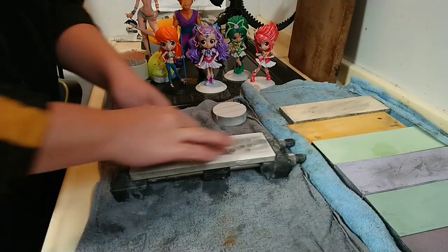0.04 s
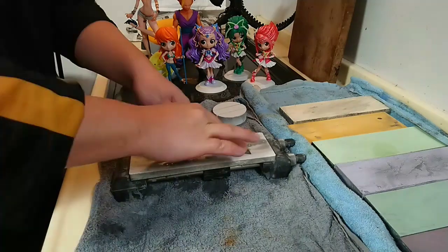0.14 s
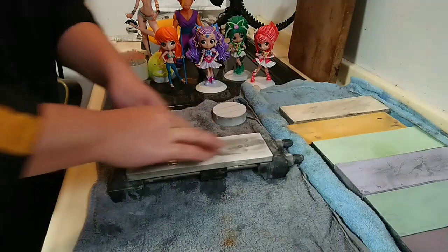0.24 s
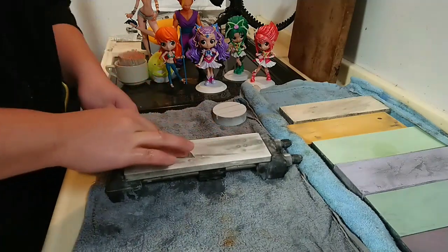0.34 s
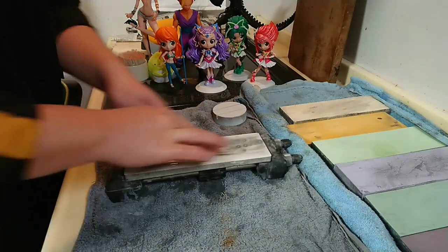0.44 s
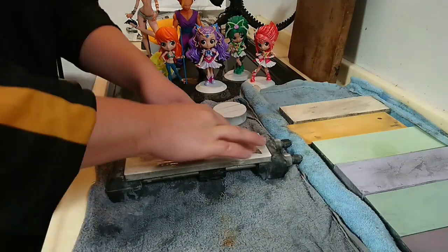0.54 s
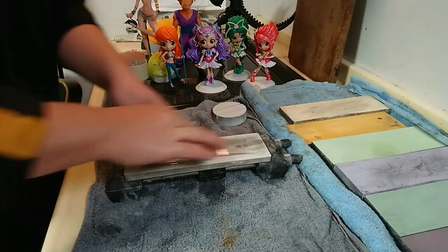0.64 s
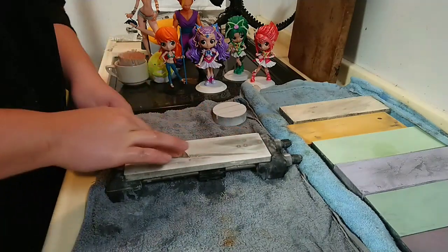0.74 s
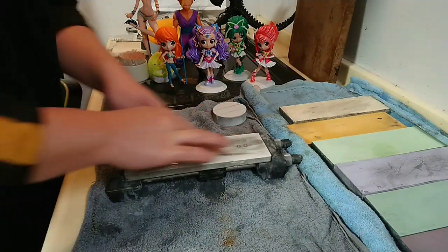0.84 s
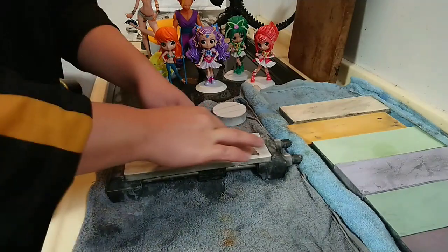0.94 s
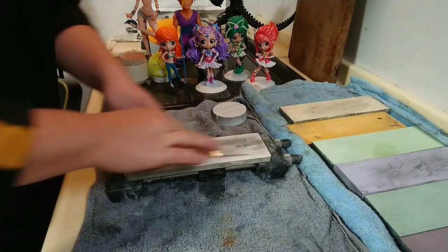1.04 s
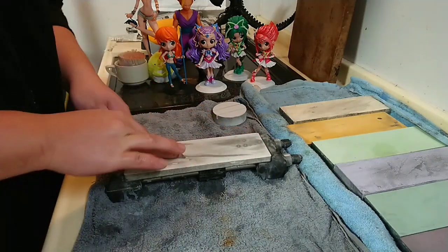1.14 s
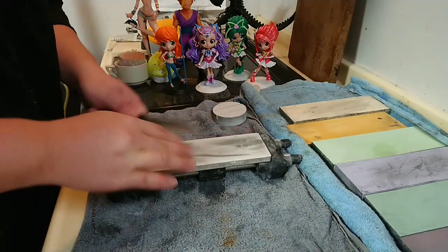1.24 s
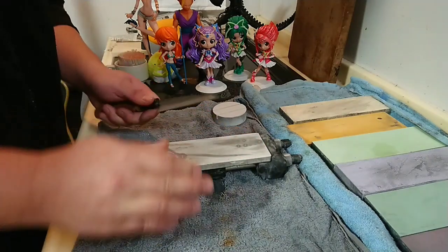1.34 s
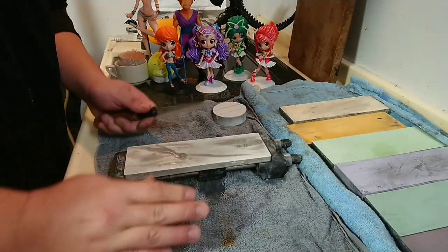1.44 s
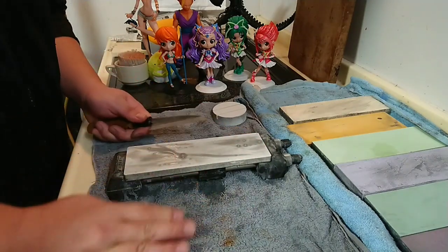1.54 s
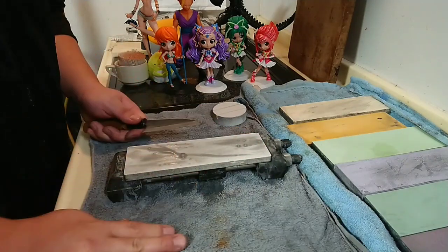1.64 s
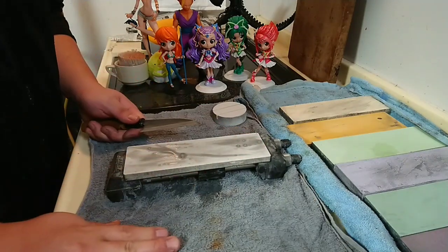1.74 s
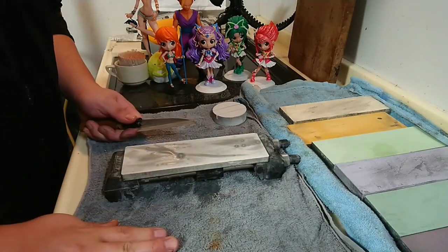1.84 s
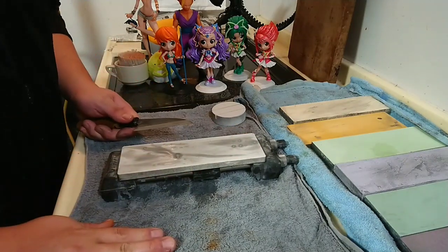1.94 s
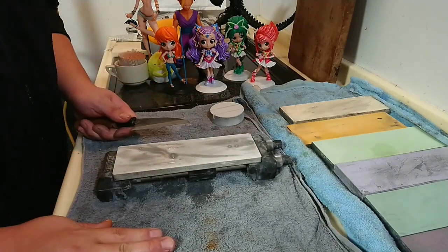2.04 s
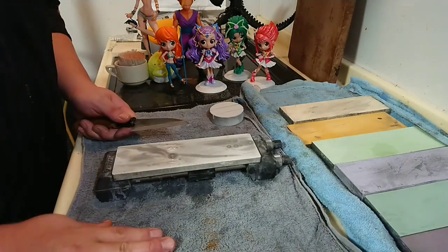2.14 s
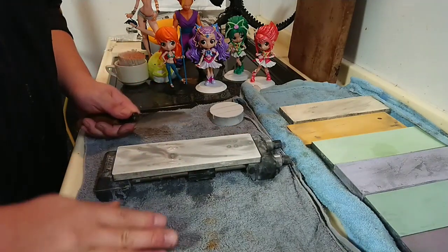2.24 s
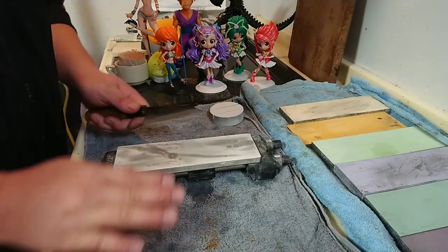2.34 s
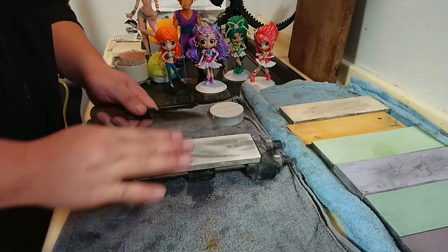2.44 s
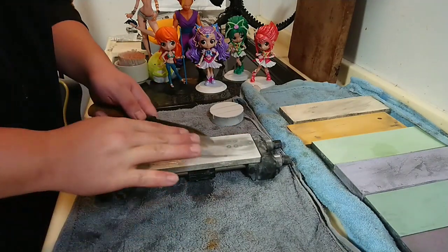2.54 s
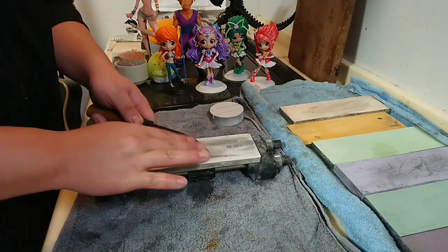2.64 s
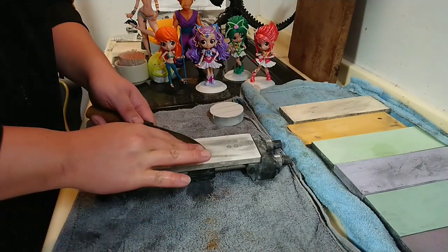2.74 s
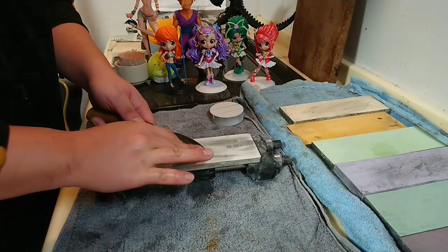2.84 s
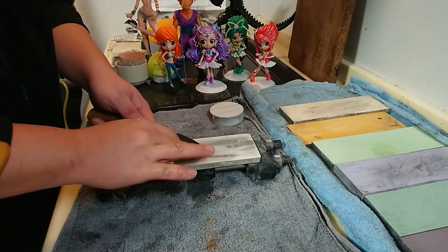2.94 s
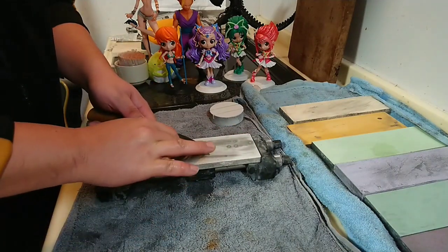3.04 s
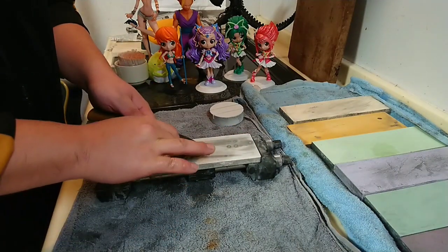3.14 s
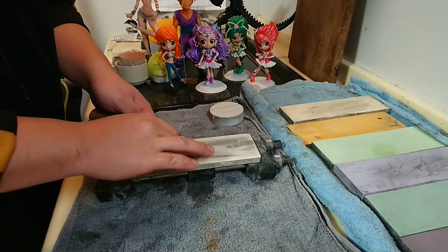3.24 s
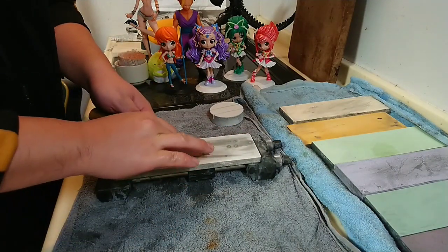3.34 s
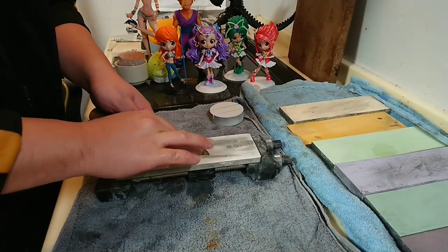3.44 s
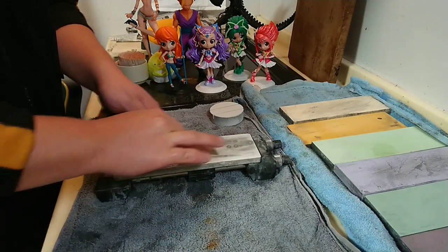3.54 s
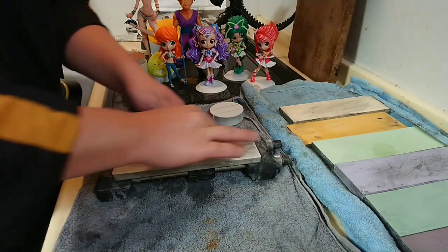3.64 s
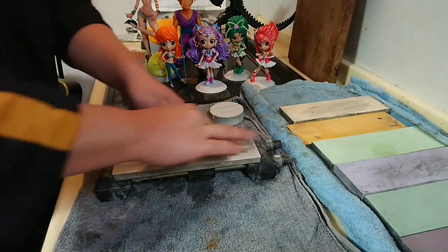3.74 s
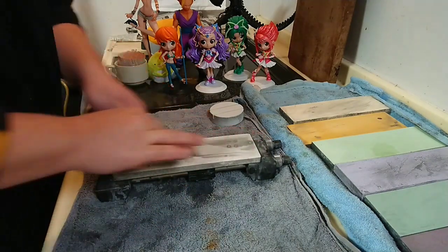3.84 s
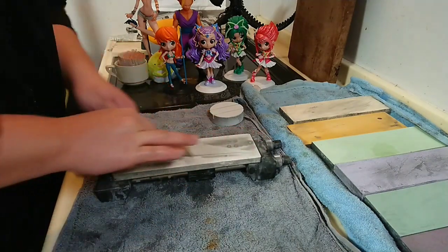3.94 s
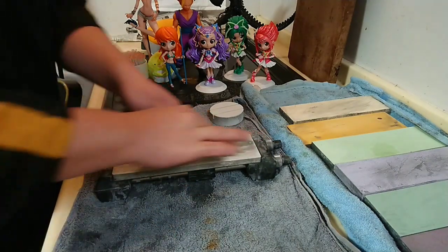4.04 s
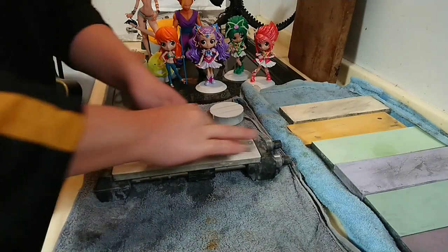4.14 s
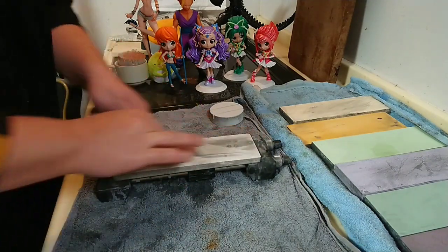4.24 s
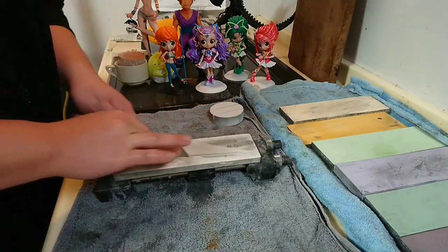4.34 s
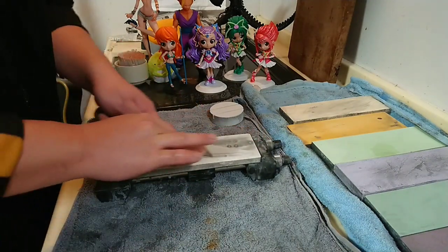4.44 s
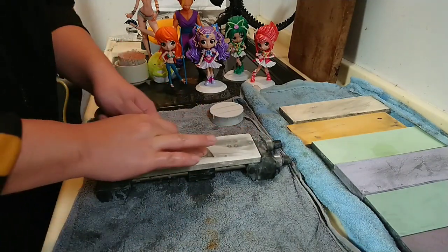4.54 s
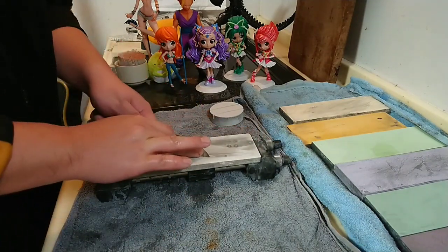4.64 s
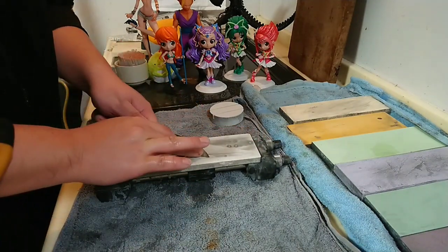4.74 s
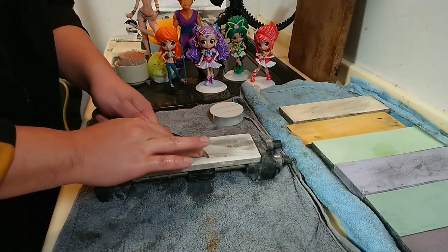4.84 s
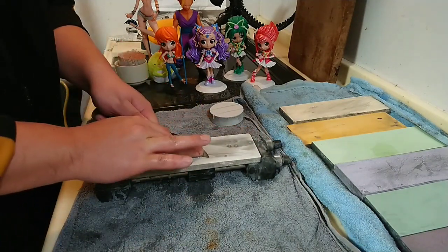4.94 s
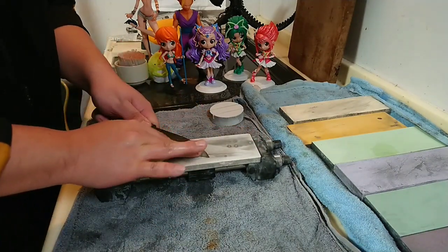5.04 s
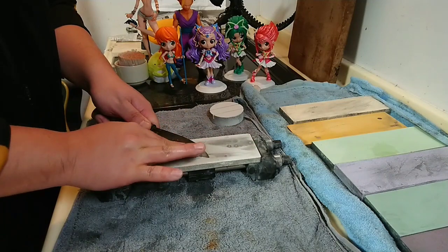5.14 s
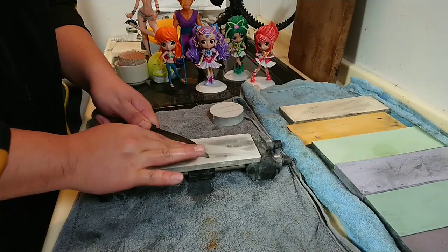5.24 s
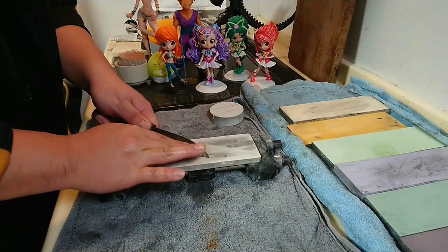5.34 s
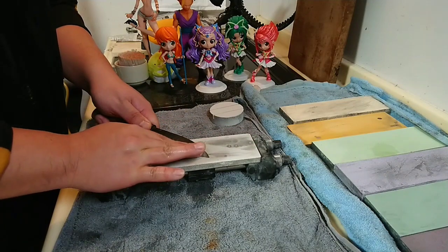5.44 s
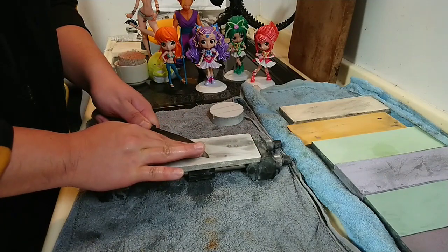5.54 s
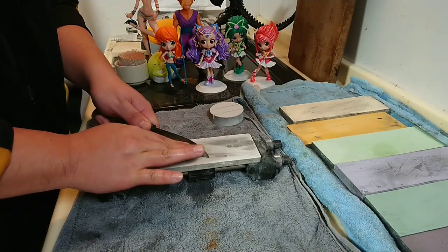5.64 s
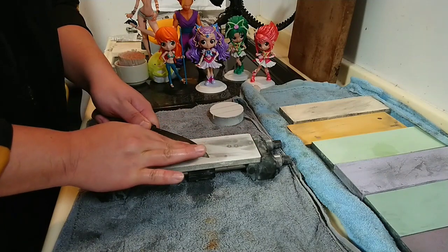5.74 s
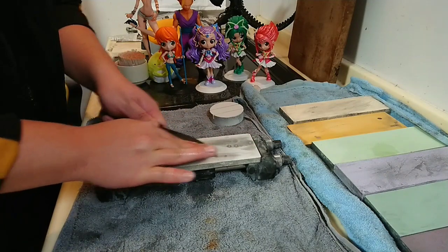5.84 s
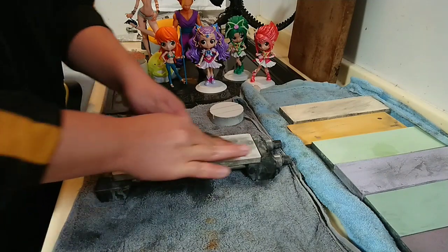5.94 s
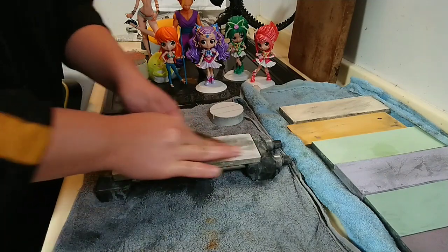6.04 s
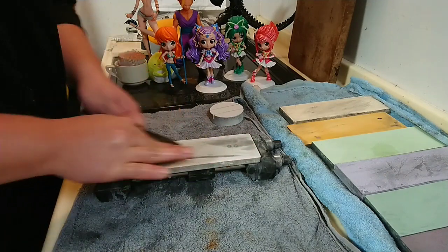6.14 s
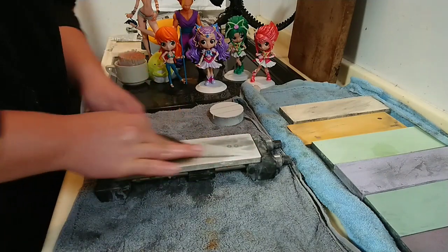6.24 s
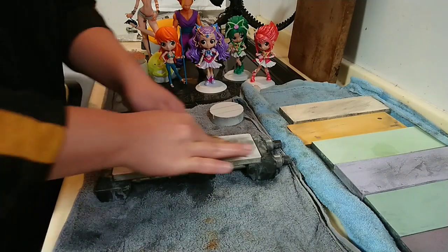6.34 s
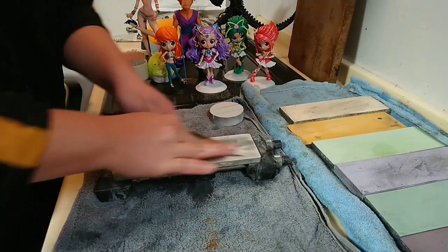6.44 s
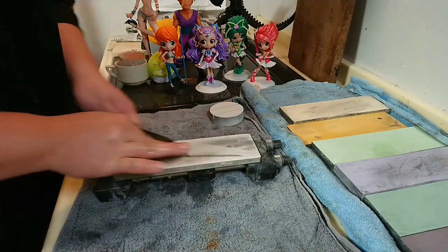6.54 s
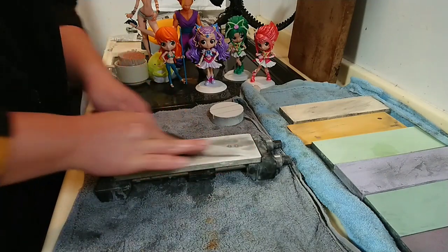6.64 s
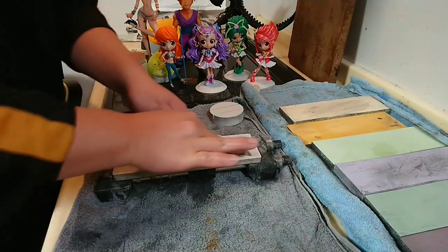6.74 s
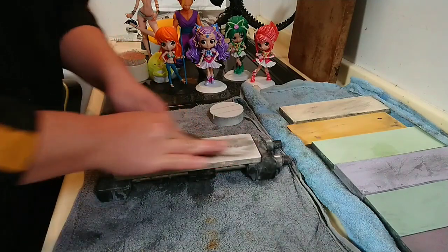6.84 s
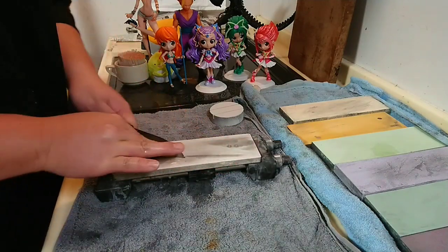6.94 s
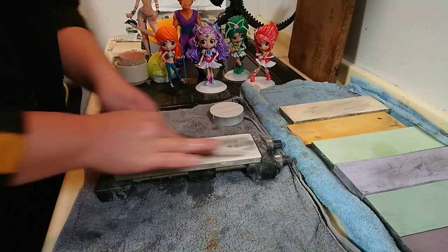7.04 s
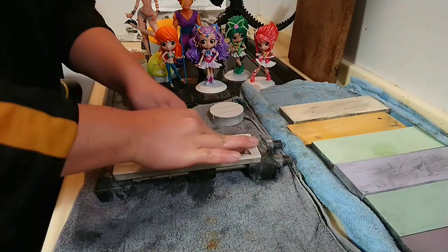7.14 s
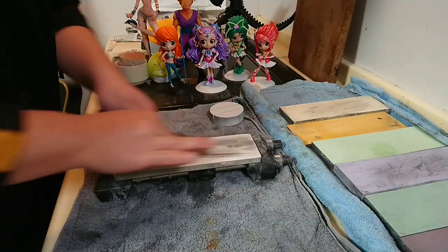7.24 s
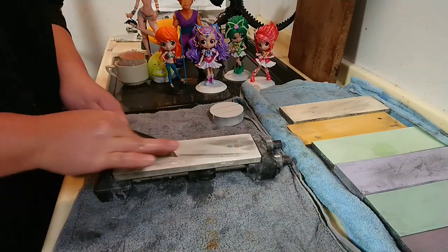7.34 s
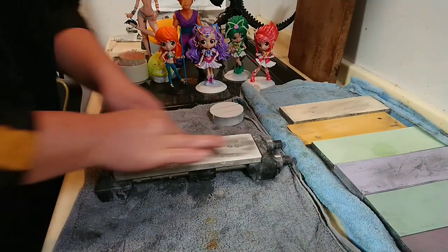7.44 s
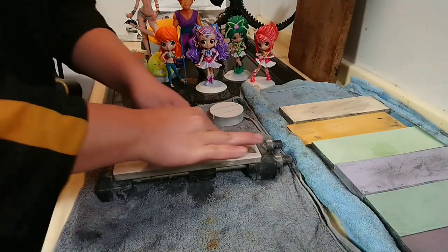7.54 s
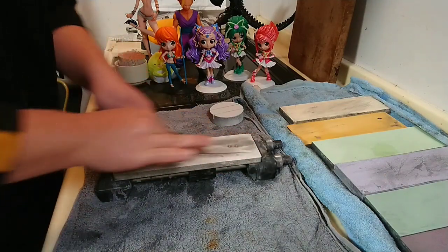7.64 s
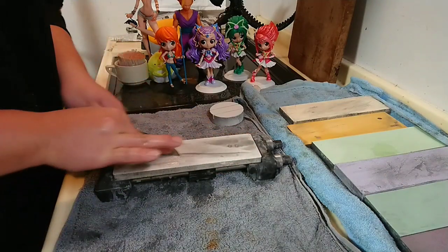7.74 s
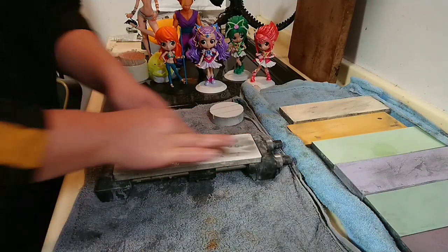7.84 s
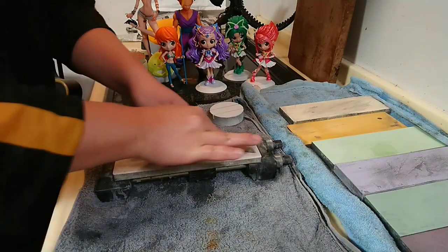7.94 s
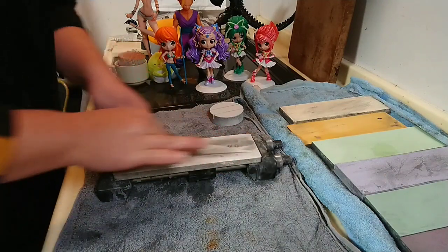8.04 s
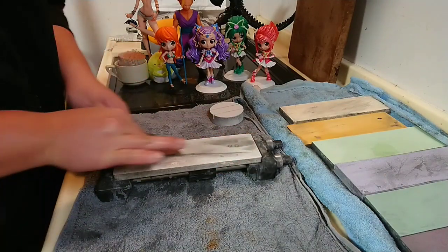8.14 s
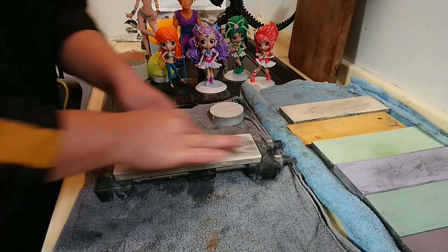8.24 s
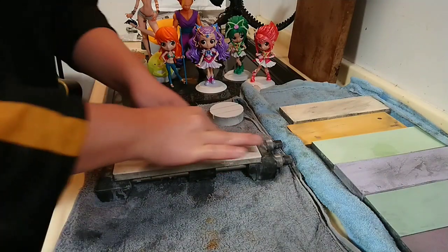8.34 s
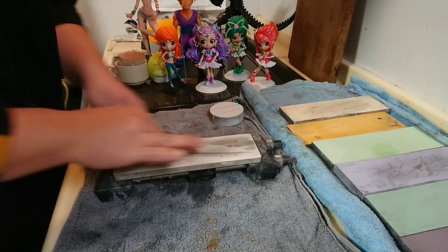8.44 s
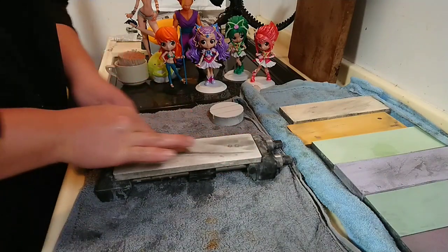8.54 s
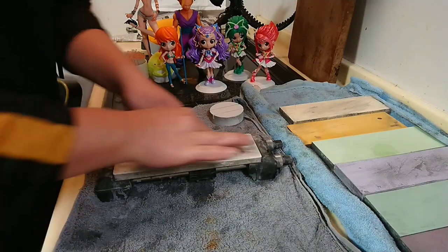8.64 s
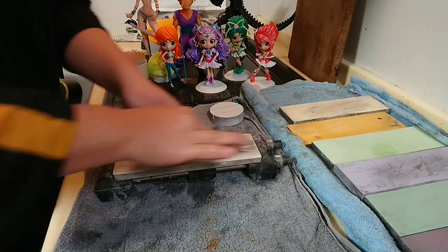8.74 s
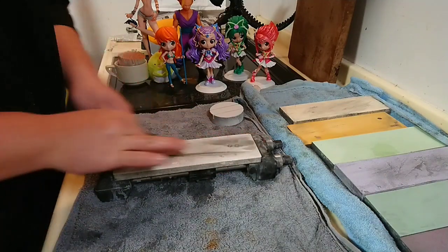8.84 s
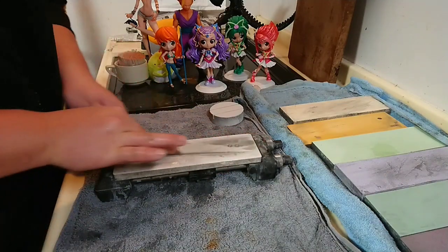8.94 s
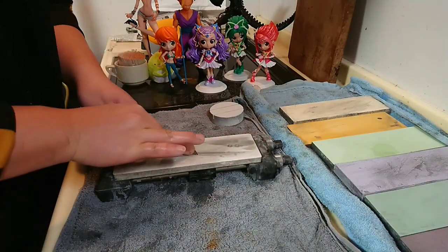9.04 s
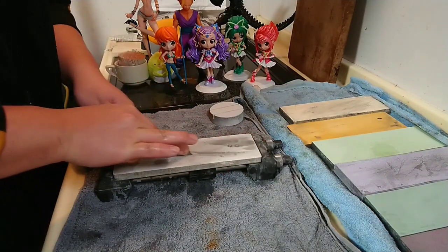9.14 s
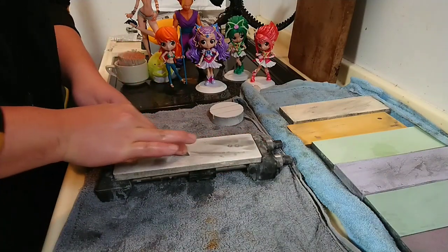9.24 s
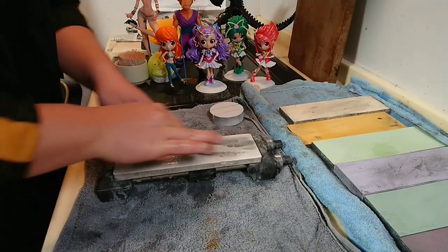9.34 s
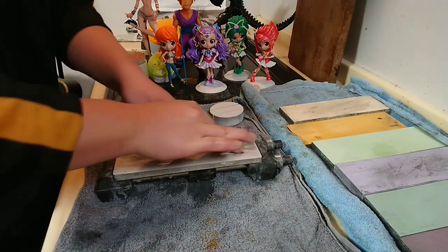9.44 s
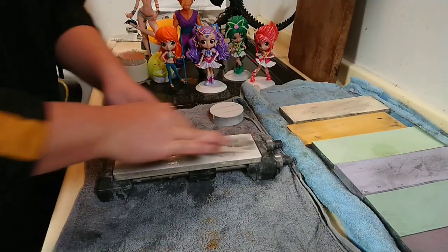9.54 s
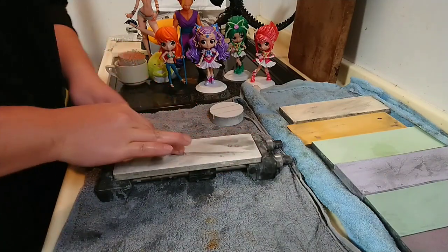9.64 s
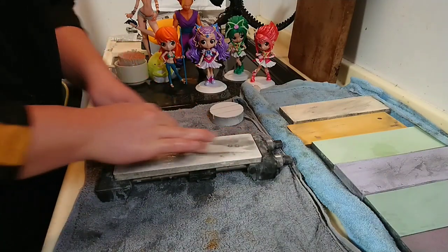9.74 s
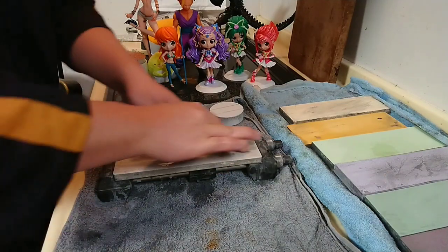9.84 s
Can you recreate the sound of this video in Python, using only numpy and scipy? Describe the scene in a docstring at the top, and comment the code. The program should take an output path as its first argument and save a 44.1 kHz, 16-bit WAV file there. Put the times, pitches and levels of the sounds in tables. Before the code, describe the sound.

Close by in a small, quiet room, a knife is sharpened on a wet whetstone in three runs of quick, hissing scrapes. The steel rings slightly and the bench rumbles with each push and pull. After the first short run comes a pause with faint hum and a few light ticks of the edge touching stone. The second run trails off, and the third and longest keeps an even rhythm with one brief slackening.

```python
"""A bench in a small room: a kitchen knife is pushed and pulled over a wet whetstone, five strokes
a second, in three runs. Grit breaks under the edge and rings the blade, rasping with speed and
pressure and dipping at each turn, while the arm's work makes the bench rumble.
Between runs the blade ticks as it is set back on the stone, over faint air and hum."""
import sys
import numpy as np
from scipy import signal
from scipy.fft import rfft, irfft, next_fast_len
from scipy.io import wavfile
from scipy.ndimage import uniform_filter1d

SR = 44100
rng = np.random.default_rng(int(sys.argv[2]) if len(sys.argv) > 2 else 0)


def bounce(signal):
    """Save signal as a 16-bit WAV file at the path given by the first command-line argument."""
    frames = np.transpose(np.atleast_2d(signal))
    limited = np.clip(frames, -1, 1)
    pcm = np.round(limited * 32767).astype(np.int16)
    wavfile.write(sys.argv[1], SR, pcm)


N = 436149
T = np.arange(N) / SR

# strokes of the knife; each run opens with a push, then pulls and pushes alternate: start_s, pressure_db
STROKES = [(-0.077, -25), (0.172, -29.5), (0.388, -25.5), (0.578, -28), (0.781, -26), (0.969, -28),
           (3.472, -26), (3.74, -24.5), (3.941, -23.5), (4.141, -25), (4.34, -33), (4.523, -45.5),
           (4.722, -58), (5.801, -22.5), (6.025, -23.5), (6.226, -22.5), (6.41, -26.5), (6.617, -24),
           (6.799, -25.5), (6.993, -23.5), (7.175, -26), (7.378, -23), (7.574, -25.5), (7.766, -24),
           (7.963, -25.5), (8.158, -22.5), (8.344, -26.5), (8.548, -23.5), (8.733, -24.5), (8.935, -29),
           (9.075, -41.5), (9.269, -25.5), (9.497, -27.5), (9.705, -25.5)]
# unbroken runs of strokes: end_s, bear_down_s, rumble_db
RUNS = [(1.178, 0.0048, -45.5), (4.852, 0.17, -44.5), (9.91, 0.1, -43)]
# feel of each direction: friction_steepness, skew (under 1 peaks early), hollow_db, ring_db, fizz_db
PUSH = (1.67, 0.99, 0.51, .3, 0.75)
PULL = (1.83, 0.89, -.6, -.7, -1.6)
# tone of the blade held loosely between runs: hollow_db, ring_db, fizz_db
LOOSE_TONE = (7.6, 0.67, 1)
# slow drift of the scrape's colour: time_s, hollow_db, fizz_db
TONE_DRIFT = [(0, 8, -1), (1.1, 6.5, -1.5), (3.5, 5.5, 1), (4.399, 4, -1.5), (6.599, 0.5, -1.2),
              (8.3, 2, 2.8), (9.8, 2, 2.5)]
# spectral shape of grit breaking under steel: frequency_hz, level_db
GRIT_SPECTRUM = [(150, -34), (300, -14), (500, -22.5), (780, -12), (1100, -15.5), (2250, -10.5), (3200, -3),
                 (4400, 3), (6200, 1.5), (8000, 0), (11000, -1), (12400, -6), (14500, -2), (16000, -14)]
# blade resonances, damped by the fingers: pitch_hz, width_hz, lift_db, far_end_change_db
BLADE_MODES = [(1440, 170, 6.5, -3.5), (1690, 150, 5.5, -3), (1850, 750, 3, 2), (2054, 220, 3, -4),
               (2667, 100, 6, -1), (2910, 90, 1.5, 5), (3224, 480, 3.5, 0.5), (3666, 73, 5, 2),
               (4360, 37, -3, 6), (4990, 400, 5, -1), (5350, 200, 5.5, 4), (5630, 190, 6, -0.9),
               (6300, 220, 2.5, -1.5), (6740, 210, 5, -2.4), (6943, 280, 5.5, 1.5), (7216, 310, 4.5, 1.2),
               (9130, 420, 3, 0.2), (10100, 520, 0, -2)]
# resonances of the bench and stone holder: pitch_hz, width_hz, level_db
BENCH_MODES = [(47.98, 2.2, -5), (54.5, 12, -4), (70, 26, -4.5), (110, 13, -7.5), (152.2, 49, -13),
               (189.2, 44, -9.5), (259, 61, -19.5)]
# spectral shape of the room's air: frequency_hz, level_db
AIR_SPECTRUM = [(100, -20), (170, -2), (300, -8), (400, -2), (600, -10), (1100, -8), (1600, -12),
                (2700, -17), (4200, -22), (7000, -16), (10200, -14), (12500, -22), (15800, -28)]
# partials of the room's hum: pitch_hz, level_db
HUM_PARTIALS = [(75.2, -67), (150.2, -78)]
# the edge catches just after some turns: time_s
CATCH_TIMES = [0.410, 5.844, 6.257, 6.429, 7.391, 8.559, 9.266]
# the edge touches down on the stone: start_s, strength_db
TOUCHDOWNS = [(2.7576, -58.5), (2.8424, -56), (2.8883, -50.5), (3.054, -50), (3.0637, -51), (3.0854, -44),
              (3.2036, -54), (3.2523, -44.5), (3.269, -45), (4.8025, -62), (5.7832, -45.5)]
# how alike the two microphone ports sound: frequency_hz, likeness (0 to 1)
PORT_LIKENESS = [(200, .88), (500, .3), (1000, .45), (1700, .72), (2200, .35), (3700, .4), (4600, .18),
                 (6300, .15), (7200, .42), (8000, .35), (9300, .8), (9900, .48), (15000, .38)]
# phase lead of the left port: frequency_hz, lead_rad
PORT_LEAD = [(600, 0), (1200, .9), (1550, 1.5), (1950, 2.9), (2600, -.7), (3800, -2.4), (5600, -2.7),
             (6700, 0), (9000, 0)]
# left port over right port: frequency_hz, balance_db
PORT_BALANCE = [(60, 10), (280, 5), (560, 14), (850, 5), (1800, -1.5), (3000, -0.6), (3600, 4), (4400, 6),
                (5500, 19), (5950, 30.5), (6500, -4.5), (7600, 1.5), (10500, 4), (14000, 1)]


def gain_of(db):
    """Decibels to gain."""
    return 10 ** (np.asarray(db) / 20)


def unit_rms(x):
    """Scales to rms 1."""
    return x / np.sqrt(np.mean(x ** 2) + 1e-20)


def curve(points, hz):
    """Joins (frequency_hz, value) points by straight lines on a log axis."""
    point_hz, value = np.transpose(points)
    return np.interp(np.log(hz + 1), np.log(point_hz + 1), value)


def bell(hz, centre, width):
    """Bell curve, 1 at its centre."""
    return 1 / (1 + (2 * (hz - centre) / width) ** 2)


def equalise(x, gain):
    """Filters x by a gain given as a function of frequency."""
    size = next_fast_len(N + 4096)
    return irfft(rfft(x, size) * gain(np.fft.rfftfreq(size, 1 / SR)), size)[..., :N]


def wander(t, per_s):
    """Random drift of rms 1 that takes a new value per_s times a second."""
    values = rng.standard_normal(size=16384)
    return unit_rms(np.interp(t * per_s, np.arange(len(values)), values))


def arm_strokes(firm_db=-23, turn_drag=0.17, handover_s=0.021, lift_off_s=0.052,
                bench_build_s=0.2, bench_settle_s=0.049):
    """The arm swings like a pendulum: friction grows with speed and pressure, and dips at each turn."""
    friction, shake, place, tone = np.zeros(N), np.zeros(N), np.zeros(N), np.zeros((3, N))
    drift_s, drift_hollow_db, drift_fizz_db = np.transpose(TONE_DRIFT)
    last_end = -np.inf
    for end, bear_down_s, rumble_db in RUNS:
        starts, pressures_db = np.transpose([row for row in STROKES if last_end < row[0] < end])
        last_end = end
        now = T >= starts[0]
        t = T[now]
        travel = np.interp(t, [*starts, end], np.arange(len(starts) + 1))  # counted in strokes
        stroke = np.minimum(travel.astype(int), len(starts) - 1)
        progress = travel - stroke
        place[now] = -np.cos(np.pi * travel)  # -1 at the near end of the stone, 1 at the far end
        steepness, skew, hollow_db, ring_db, fizz_db = np.array([PUSH, PULL])[stroke % 2].T
        # the hand bears down, holds each stroke's pressure, and eases off
        pressure_db = uniform_filter1d(pressures_db[stroke], size=round(handover_s * SR))
        bearing = 1 - np.exp(-(t - starts[0]) / bear_down_s)
        after_s = np.maximum(t - end, 0)
        held = np.exp(-after_s / lift_off_s)
        speed = np.abs(np.sin(np.pi * progress ** skew))
        drag = turn_drag + (1 - turn_drag) * np.tanh(1.94 * speed ** steepness)  # levels off at speed
        friction[now] = bearing * held * gain_of(pressure_db) * drag
        # the bench is jolted hardest just after each turn
        jolt = 0.71 + 0.67 * np.abs(np.sin(np.pi * progress ** 0.28))
        rocking = (1 - np.exp(-(t - starts[0]) / bench_build_s)) * np.exp(-after_s / bench_settle_s)
        # a lighter stroke shakes the bench less and sounds hollower
        effort_db = pressure_db - firm_db
        shake[now] = rocking * jolt * gain_of(rumble_db + 0.36 * effort_db)
        hollow_db = hollow_db + np.interp(t, drift_s, drift_hollow_db) - 0.15 * effort_db
        fizz_db = fizz_db + np.interp(t, drift_s, drift_fizz_db)
        tone[:, now] = held * np.array([hollow_db, ring_db, fizz_db]) + np.outer(LOOSE_TONE, 1 - held)
    friction = uniform_filter1d(friction, size=300) * gain_of(0.5 * wander(T, per_s=25))
    shake *= gain_of(1.1 * wander(T, per_s=16))
    return friction, shake, place, uniform_filter1d(tone, size=1200)


def grit(grains_per_s=20000, chatter_db=-0.64, grip_db=0.7):
    """Countless tiny fractures of uneven size over the hiss of the slurry; the edge grips and lets go."""
    grain_size = gain_of(2.4 * np.minimum(rng.exponential(1, N), 4))
    breaks = rng.random(N) < grains_per_s / SR
    grains = unit_rms(grain_size * breaks * rng.standard_normal((2, N)))
    hiss = 0.71 * rng.standard_normal((2, N))
    bite_db = chatter_db * wander(T, per_s=480) + grip_db * wander(T, per_s=70)
    return unit_rms((grains + hiss) * gain_of(np.minimum(bite_db, 3.5)))


def mid_dip(hz, t, place, mid_dip_db=8):
    """A faint dip near 550 Hz in the overall sound, timed with the louder strokes."""
    depth = np.clip(np.gradient(place, t) / 12, 0, 1)
    return mid_dip_db * depth * bell(hz, 550, 470)


def blade(drive, place, tone, glide=0.013, bounce_s=0.00043, patchy_db=1.9):
    """Shapes the scrape; the blade's resonances shift and flare as the contact moves along the edge."""
    hz, t, spectrum = signal.stft(drive, SR, nperseg=512, noverlap=256)
    hz = hz[:, None]
    place, hollow_db, ring_db, fizz_db = (np.interp(t, T, control) for control in (place, *tone))
    eq_db = curve(GRIT_SPECTRUM, hz) + 2.1 * ring_db * bell(hz, 6100, 3000)  # ring of the edge
    eq_db += 0.95 * fizz_db / (1 + (8500 / (hz + 1)) ** 6)  # treble shelf
    # a blade laid flat sounds its two low bending modes
    eq_db += hollow_db * (1.4 * bell(hz, 1480, 800) + 0.37 * bell(hz, 3250, 230))
    # a bounce off the bench top combs the sound, and the comb sweeps as the knife travels
    eq_db -= 0.33 * np.cos(2 * np.pi * hz * bounce_s * (1 + 0.11 * place))
    for pitch_hz, width_hz, lift_db, far_db in BLADE_MODES:
        flare_db = 2.2 * np.sqrt(abs(lift_db) / 4) * wander(t, per_s=36)  # strong modes flare most
        detune = 1 + 0.012 * wander(t, per_s=14) + glide * place
        eq_db += (lift_db + far_db * place + flare_db) * bell(hz, pitch_hz * detune, width_hz)
    eq_db -= mid_dip(hz, t, place)
    # many weaker modes come and go
    patches = uniform_filter1d(rng.standard_normal(eq_db.shape), size=4, axis=0)
    patches = uniform_filter1d(patches, size=3, axis=1)
    gain = gain_of(eq_db + patchy_db * unit_rms(patches))
    gain /= np.sqrt(uniform_filter1d(np.mean(gain ** 2, axis=0), size=3))  # the drive sets the level
    return signal.istft(spectrum * gain, SR, nperseg=512, noverlap=256)[1][:, :N]


def reflections(x, t60_s, delay_s):
    """Sparse echoes of random sign that die away, a separate set for each channel."""
    t = T[:SR * 3 // 4]
    taps = rng.choice([-1., 1.], (2, len(t))) * (rng.random((2, len(t))) < 1 / 12)
    taps *= gain_of(-60 * t / t60_s) * (t > delay_s)
    taps /= np.linalg.norm(taps, axis=1, keepdims=True)
    return signal.fftconvolve(x, taps, axes=1)[:, :N]


def bench_rumble(shake, band_hz=(38, 330)):
    """The dragging blade shakes the stone holder and the bench, which ring on in a few low modes."""
    shove = shake * rng.standard_normal((2, N))
    ringing = np.zeros((2, N))
    for k, (pitch_hz, width_hz, level_db) in enumerate(BENCH_MODES):
        mode = signal.lfilter(*signal.iirpeak(pitch_hz, pitch_hz / width_hz, SR), shove)
        makeup = np.sqrt(SR / (np.pi * width_hz))  # a narrow mode passes less of the noise
        ringing += (-1) ** k * gain_of(level_db) * makeup * mode
    return signal.sosfilt(signal.butter(4, band_hz, "band", fs=SR, output="sos"), ringing)


def room_tone(air_db=-77.5):
    """A bed of faint air, with a wavering hum in the first channel."""
    air = equalise(rng.standard_normal((2, N)), lambda hz: gain_of(curve(AIR_SPECTRUM, hz)))
    bed = gain_of(air_db) * unit_rms(air)
    for pitch_hz, level_db in HUM_PARTIALS:
        bed[0] += gain_of(level_db - wander(T, per_s=4.9)) * np.sin(2 * np.pi * pitch_hz * T)
    return np.sqrt(2) * bed


def edge_catches(jump_db=4, slip_s=0.015):
    """Gain on the friction: it jumps where the edge catches, then slips back."""
    snags = sum((T >= time_s) * np.exp(-np.abs(T - time_s) / slip_s) for time_s in CATCH_TIMES)
    return gain_of(jump_db * snags)


def edge_touches(trim_db=-9, resting_db=-75, rise_s=0.0004, tick_s=0.0013, scratch_s=0.0075, skid_s=0.03):
    """Force of the edge touching down: a tick, a short scratch and a weak skid each time."""
    force = gain_of(resting_db) * ((T > 2.75) & (T < 3.47))  # the resting edge barely rubs
    age = T[:SR // 6]
    touch = 1.2 * np.exp(-age / tick_s) + np.exp(-age / scratch_s) + 0.3 * np.exp(-age / skid_s)
    touch *= 1 - np.exp(-age / rise_s)
    for start_s, strength_db in TOUCHDOWNS:
        start = round(start_s * SR)
        force[start:start + len(touch)] += gain_of(strength_db + trim_db) * touch
    return force


def microphone_ports(x):
    """Stereo image: row 0 reaches both ports, row 1 only the right, which has a deep notch near 6 kHz."""
    alike = lambda hz: np.clip(curve(PORT_LIKENESS, hz), 0, 1)
    right_gain = lambda hz: np.sqrt(2 / (1 + gain_of(curve(PORT_BALANCE, hz)) ** 2))
    left = equalise(x[0], lambda hz: np.sqrt(2 - right_gain(hz) ** 2))
    shared = equalise(x[0], lambda hz: right_gain(hz) * alike(hz) * np.exp(-1j * curve(PORT_LEAD, hz)))
    right_only = equalise(x[1], lambda hz: right_gain(hz) * np.sqrt(1 - alike(hz) ** 2))
    return np.array([left, shared + right_only])


def scene(bench_top_db=-8, room_db=-22, handling_db=-68):
    """The mix: the scrape, its reflections off the bench top and the room, rumble and room tone."""
    friction, shake, place, tone = arm_strokes()
    force = friction * edge_catches() + edge_touches()
    scrape = blade(grit() * force, place, tone)
    bench_top = gain_of(bench_top_db) * reflections(scrape, t60_s=0.099, delay_s=0.00098)
    room = gain_of(room_db) * reflections(scrape, t60_s=0.28, delay_s=0.015)
    rumble = bench_rumble(shake + gain_of(handling_db))  # resting hands still stir the bench a little
    return microphone_ports(scrape + bench_top + room + rumble + room_tone())


def record(dry, cutoff_hz=15900):
    """A steep low-pass trims the very top."""
    lowpass = signal.firwin(511, cutoff_hz, window=("kaiser", 9), fs=SR)
    return signal.oaconvolve(dry, lowpass[None], "same")


dry = scene()
out = record(dry)
bounce(out)
```